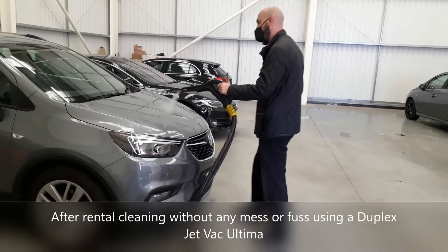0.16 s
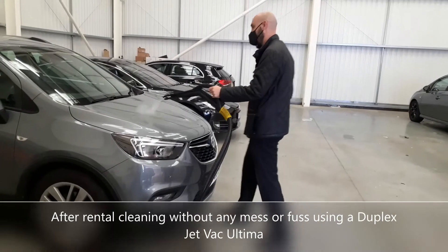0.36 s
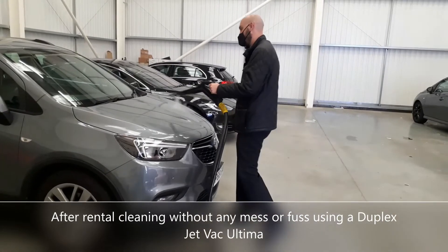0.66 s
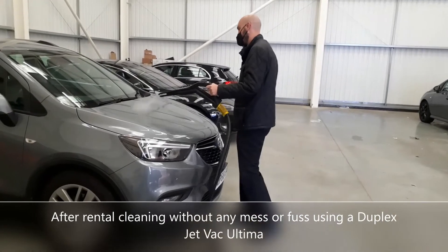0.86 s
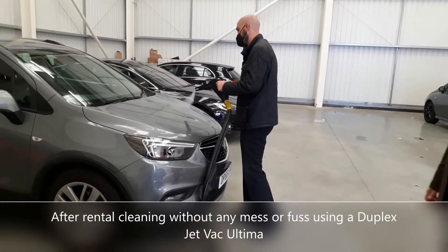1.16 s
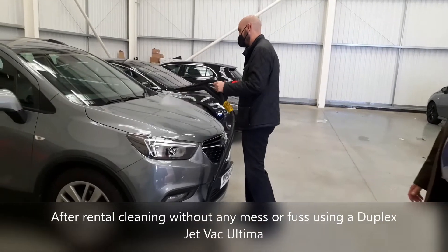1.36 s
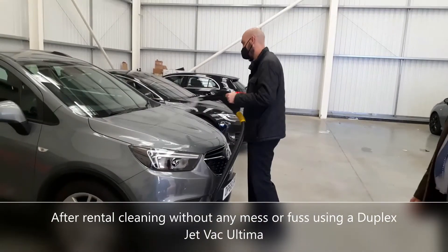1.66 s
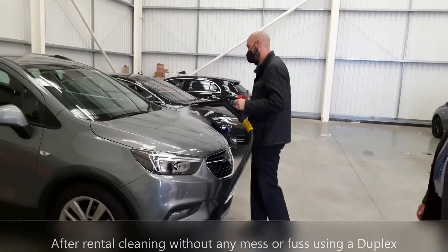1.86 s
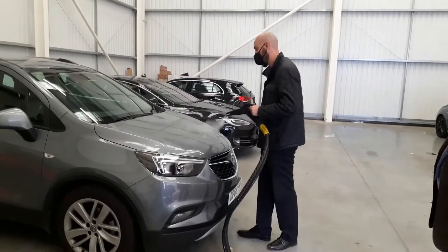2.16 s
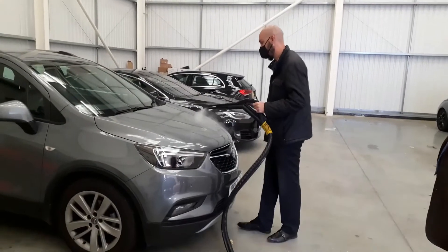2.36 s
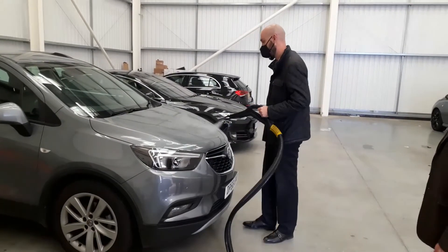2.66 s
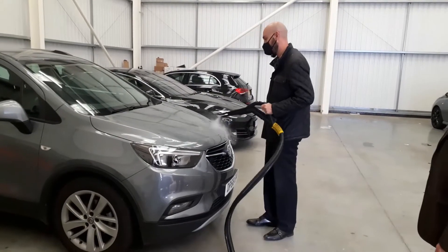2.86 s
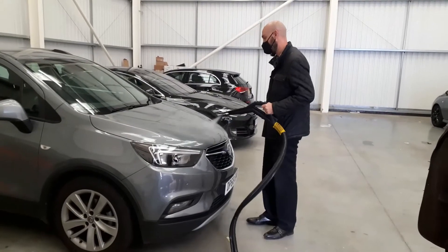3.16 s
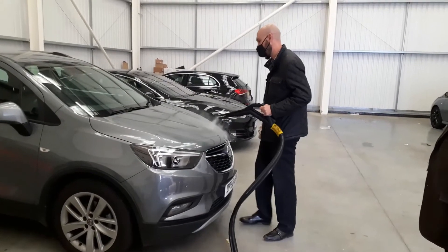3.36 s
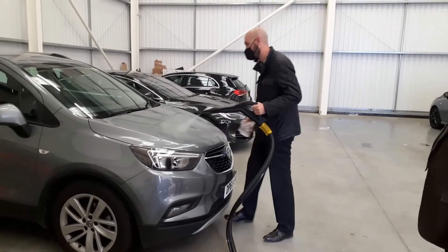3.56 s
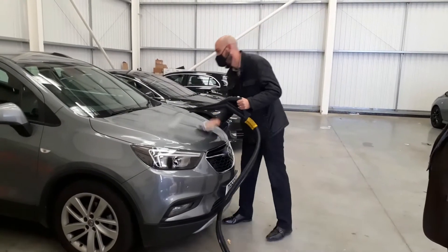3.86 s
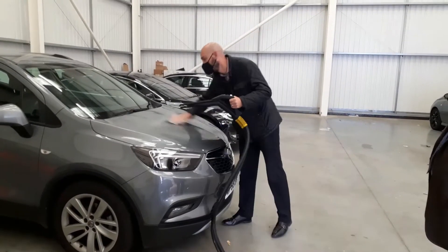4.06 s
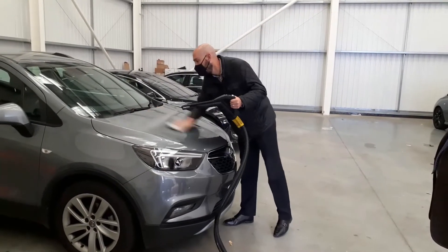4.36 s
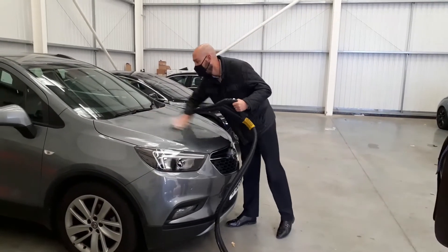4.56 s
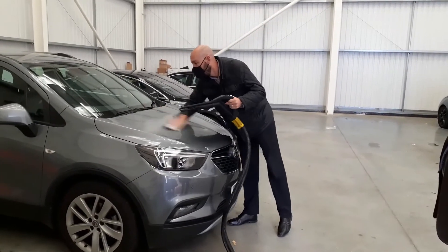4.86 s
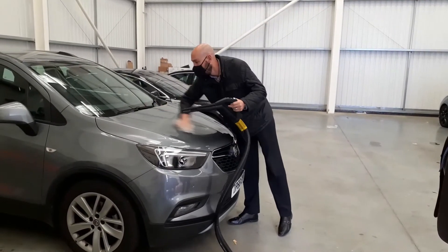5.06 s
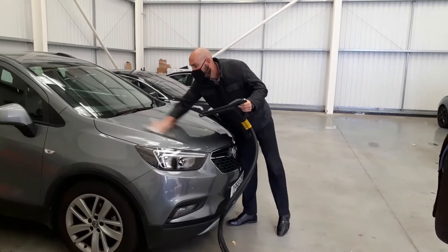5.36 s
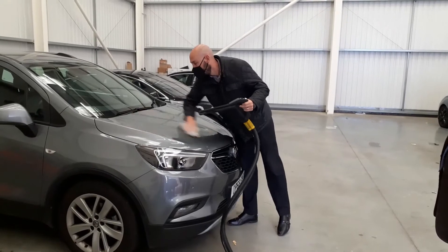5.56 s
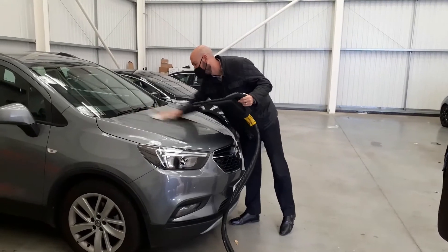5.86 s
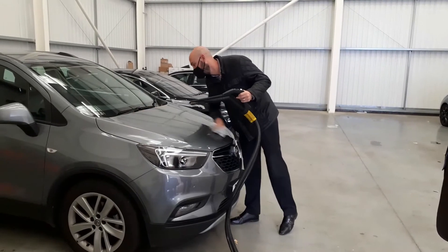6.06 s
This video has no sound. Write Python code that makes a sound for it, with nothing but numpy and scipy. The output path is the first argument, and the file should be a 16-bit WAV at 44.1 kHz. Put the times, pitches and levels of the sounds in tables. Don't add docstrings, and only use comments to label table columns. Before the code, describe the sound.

A large, reverberant metal hall rumbles low throughout. At 0.1-0.25 s a quick cluster of dull door thuds booms, while the steam is still faint. From about 0.3 s a steam lance bursts into a bright, close hiss, fuller by 0.8 s, then steady but fluttering, with short surges as it crosses the car's edges; a hollow, breathy roar colours it around 2 kHz. Faint airy whistles come and go, clearest near 4.85 s. Far away an engine revs up until about 1.5 s, drops by 2 s, then hums on low and fades from earshot around 4.9 s. Panel thuds and a sharper knock land at 1.12-1.2 s; duller thuds and a knock at 3.9-4.3 s, then more from 5.0 to 5.4 s, each with a long hall boom. The hiss is strongest near 4.85-5 s, weakens after 5.2 s and dies away towards 6 s, leaving rumble.

```python
import sys
import numpy as np
from scipy import signal
from scipy.fft import rfft, irfft, next_fast_len
from scipy.io import wavfile

SR = 44100
rng = np.random.default_rng(int(sys.argv[2]) if len(sys.argv) > 2 else 0)


def ratio_of_db(decibels):
    return 10 ** (np.asarray(decibels, float) / 20)


def put_to_file(sound):
    columns = np.atleast_2d(sound).T
    safe = np.clip(columns, -1, 1)
    whole_steps = np.round(safe * 32767)
    wavfile.write(sys.argv[1], SR, whole_steps.astype(np.int16))


N = 273199


def in_time(rows):
    s, *columns = np.transpose(rows)
    return [np.interp(np.arange(N) / SR, s, column) for column in columns]


def at_hz(points, hz):
    table_hz, value = np.array(points)[:, 0], np.array(points)[:, 1]
    return np.interp(np.log(hz), np.log(table_hz), value)


def rms_one(x):
    return x / np.sqrt(np.mean(x ** 2) + 1e-20)


def drift(rate_hz):
    step = 40
    settle = 2000
    r = np.exp(-2 * np.pi * step * rate_hz / SR)
    noise = rng.standard_normal(N // step + settle + 2)
    slow = signal.lfilter([1], [1, -2 * r, r * r], noise)[settle:]
    return np.interp(np.arange(N) / step, np.arange(len(slow)), rms_one(slow))


def bump(s, fall_s, rise_share=1):
    step = 64
    t = np.arange(0, N + step, step) / SR - s
    length_s = max(fall_s, .01) * np.where(t < 0, rise_share, 1)
    bell = np.exp(-(t / length_s) ** 2)
    return np.interp(np.arange(N) / step, np.arange(len(t)), bell)


# frequency in Hz, left-right likeness from 0 to 1.
LIKENESS = [(40, 1), (125, 0.67), (250, 0.76), (500, 0.46), (1000, 0.077), (4000, 0.051)]


def coloured(spectrum, size):
    hz = np.maximum(np.fft.rfftfreq(size, 1 / SR), 1)
    mid, side = rfft(rng.standard_normal((2, size)))
    alike = np.clip(at_hz(LIKENESS, hz), 0, 1)
    both = np.sqrt(1 + alike) * mid + np.sqrt(1 - alike) * side * [[1], [-1]]
    inside = (hz > spectrum[0][0]) & (hz < spectrum[-1][0])
    return rms_one(irfft(both * ratio_of_db(at_hz(spectrum, hz)) * inside, size))


def patchy(noise, low_hz, gain_db, count):
    size = next_fast_len(N, True)
    hz = np.fft.rfftfreq(size, 1 / SR)
    spectrum = rfft(noise, size)
    thirds = np.log2(np.maximum(hz, 1) / low_hz) * 3
    out = 0
    for k in range(count):
        window = np.cos(np.pi / 2 * np.clip(thirds - k, -1, 1)) ** 2
        band = irfft(spectrum * window, size)[:, :N]
        out = out + ratio_of_db(gain_db(low_hz * 2 ** (k / 3))) * band
    return out


# start in seconds, steam flow in dB, nearness to the panel as roar gain
# in dB, aim at the microphone as sizzle gain in dB, pitch of the hollow under the nozzle in Hz.
HANDLING = [(0.0, -61.5, 6, -4, 2000), (0.15, -53.5, -2.5, -5, 2100), (0.275, -51, -4, -4, 2800),
            (0.31, -43.5, -4.5, -6, 3060), (0.72, -47.5, -6.5, -5.5, 2500), (0.78, -42, -8.5, 0, 2150),
            (0.84, -39.5, -3, -3, 1900), (1.31, -40.5, -2, -5.5, 2280), (1.36, -38.5, 2, -5, 2390),
            (1.85, -38, -0.5, -6, 2270), (2.2, -38.5, -1.5, -4.5, 2550), (2.6, -37, -2.5, -4.5, 2360),
            (3.33, -39, -1.5, -3.5, 2540), (3.8, -39, -3.5, -3, 2270), (4.1, -37.5, -2, -2, 2360),
            (5.02, -35.5, -2.5, -2.5, 2380), (5.28, -45.5, 1.5, -2.5, 2207), (6.19, -64, 0, -4, 2003)]
# time in seconds, gain in dB, length in seconds, colour
SURGES = [(0.3, 4.5, 0.036, 0.44), (0.765, 2, 0.019, 1), (0.993, 0, 0.17, 1), (1.17, -1, 0.094, -1.3),
          (1.36, 0.5, 0.025, -1.15), (1.558, 1, 0.16, -0.062), (1.93, 3, 0.12, .4), (2.463, 1.5, .12, 0.79),
          (2.675, 2, 0.057, 0.93), (2.755, 2, 0.1, -0.89), (2.928, 3.5, 0.083, -0.23),
          (3.04, 3.5, 0.17, -0.02), (3.216, 2.5, 0.044, 0.69), (3.434, 4.5, 0.081, -0.24),
          (3.55, 4, 0.096, -0.093), (3.951, 2, 0.14, -1.04), (4.254, 3, 0.17, -0.11),
          (4.4, 0.5, 0.067, 0.91), (4.484, 1.5, .05, 0.99), (4.7, -0.5, 0.035, -0.75),
          (4.758, 1.5, .05, -0.76), (4.849, 5, 0.091, -0.39), (4.912, 1, 0.054, .6), (5.476, 1, 0.17, 0.79),
          (5.65, 3.5, 0.053, 0.062)]
SURGE_RISE_SHARE = 0.47
ROAR_WANDER, SURGE_LIFT = 0.11, 0.061
SIZZLE_SHARE, SWAY_DB = 0.95, 1


def lance():
    flow_db, near_db, aim_db, hollow_hz = in_time(HANDLING)
    surges = np.array([bump(s, fall_s, SURGE_RISE_SHARE) for s, _, fall_s, _ in SURGES])
    _, gain_db, _, colour = np.transpose(SURGES)
    surge_db = gain_db @ surges
    tilt_db = (np.abs(gain_db) * colour) @ surges
    jet_db = flow_db + surge_db
    roar_db = jet_db + near_db - tilt_db
    roar_hz = hollow_hz * (1 + ROAR_WANDER * drift(4.0) + SURGE_LIFT * surge_db)
    sizzle_db = jet_db + aim_db + SIZZLE_SHARE * tilt_db
    return jet_db, roar_db, roar_hz, sizzle_db, SWAY_DB * drift(4.7)


# frequency in Hz, density in dB per Hz.
JET = [(800, -10.5), (1100, -9), (1400, -6.5), (1700, -4), (2080, -4), (2550, -5.5), (3100, -4), (4500, -5),
       (7200, -6.5), (8700, -3.5), (10000, -4), (12000, -1.5), (15000, -3), (16200, -1.5)]


def steam():
    jet_db, roar_db, roar_hz, sizzle_db, sway_db = lance()
    flutter = drift(12.4)

    def band_db(hz):
        low_share = np.clip(np.log2(5500 / hz) / 1.2, 0, 1)
        hollow_db = 1.85 * np.exp(-(np.log2(hz / roar_hz) / 0.2) ** 2)
        hollow_db = hollow_db - 3.7 * np.clip(np.log2(0.71 * roar_hz / hz), 0, 1)
        level_db = low_share * (roar_db + 6.5 + hollow_db) + (1 - low_share) * (jet_db + 4.5)
        if hz > 10000:
            level_db = sizzle_db + 3.5
        return level_db + 0.19 * flutter + 0.73 * drift(8.7)

    jet = patchy(coloured(JET, size=next_fast_len(N, True)), 814, band_db, count=14)
    return jet * ratio_of_db(sway_db * [[.5], [-.5]])


# start in seconds, end in seconds,
# pitch in Hz, width in Hz, level in dB.
WHISTLES = [(0.797, 1.21, 1597, 220, -49.5), (1.366, 1.616, 1940, 299.6, -51),
            (1.618, 2.05, 1890, 300, -50), (2.712, 2.828, 3600, 900, -44), (2.903, 3.104, 3300, 797, -45),
            (3.413, 3.54, 3100, 900, -42), (4.837, 4.952, 2150, 400, -27), (4.944, 5.35, 2150, 500, -48),
            (.293, .345, 3200, 700, -52), (.295, .34, 6000, 3000, -48), (0.807, 0.955, 7940, 900, -39),
            (4.202, 4.548, 12750, 1500, -44)]


def whistles():
    out, t = np.zeros((2, N)), np.arange(N) / SR
    for start, end, hz, width_hz, level_db in WHISTLES:
        r = np.exp(-np.pi * width_hz / SR)
        poles = [1, -2 * r * np.cos(2 * np.pi * hz / SR), r * r]
        tone = signal.lfilter([1], np.convolve(poles, poles), rng.standard_normal((2, N)))
        swell = np.clip(np.minimum((t - start) / 0.031, (end - t) / 0.22), 0, 1)
        out += ratio_of_db(level_db) * swell * rms_one(tone)
    return out


# time in seconds, firing rate in Hz, fundamental in dB, second order in dB.
ENGINE = [(0.0, 45.2, -54, -67), (0.3, 51.84, -50, -44.5), (0.55, 56.5, -51.5, -49.5),
          (0.75, 64.4, -48, -58), (0.83, 65.7, -39.5, -67), (1.12, 71.9, -37.5, -69),
          (1.42, 75.5, -35.5, -72), (1.72, 59.2, -44.5, -61), (1.98, 43.8, -52, -56), (2.2, 42.4, -60, -54),
          (2.28, 44.2, -52, -40.5), (2.65, 47.1, -43, -51), (2.88, 48.8, -37.5, -51),
          (3.17, 50.4, -39, -47.5), (3.3, 51.3, -48.5, -57), (3.97, 50.2, -44, -98),
          (4.18, 49.1, -55.5, -58), (4.92, 47.4, -54, -59.5)]


def engine():
    hz, first_db, second_db = in_time(ENGINE)
    phase = 2 * np.pi * np.cumsum(hz) / SR
    waver = 0.2 * drift(5) + 0.2 * drift(3.7) * [[1], [-1]]
    after_last_s = np.arange(N) / SR - ENGINE[-1][0]
    away_db = -14 * np.clip(after_last_s / 0.0493, 0, 1)
    first = ratio_of_db(first_db + 0.31 * away_db + 2.0 * drift(18.0)) * np.sin(phase + waver)
    second = ratio_of_db(second_db + away_db + 1.4 * drift(3.1)) * np.sin(2 * phase + 1.4 * waver)
    return np.sqrt(2) * (first * ratio_of_db(np.array([[-.2], [.2]])) + second)


# time in seconds, peak in dB, pitch in Hz, T60 in seconds, hall
# answer in dB.
THUDS = [
    (0.103, -30.5, 143, 0.077, -6),
    (0.11, -27, 142, 0.045, -5.5),
    (0.141, -26, 119, 0.045, -1.5),
    (0.185, -29.5, 127, 0.066, 0.5),
    (0.209, -30, 131, 0.11, -15),
    (0.234, -31.5, 240, 0.094, 2),
    (1.134, -34, 136, 0.038, 3),
    (1.164, -27.5, 287, 0.15, -1),
    (1.195, -33.5, 318, 0.068, -13),
         (3.924, -34, 317, 0.065, 3), (3.939, -34, 279, 0.19, -7), (3.957, -35, 306, 0.16, 4.5),
              (4.279, -42, 90.5, 0.12, -4), (4.509, -54, 196.3, 0.1, 11), (5.005, -31, 254, 0.094, 0.5),
              (5.087, -37, 98, 0.19, -4), (5.12, -37, 102.5, 0.2, 3), (5.185, -36, 303, 0.083, 2),
              (5.326, -33.5, 110, 0.11, -6), (5.349, -32.5, 126, 0.1, -11.5), (5.378, -40, 112, 0.23, -4)]
# time in seconds, peak in dB, pitch in Hz, T60 in seconds, hall answer in
# dB.
KNOCKS = [
    (0.805, -45, 590, 0.039, -15),
    (1.122, -39, 586, 0.046, 7.5),
    (1.155, -31.5, 556, 0.081, -18),
    (1.179, -44, 436, 0.016, -3),
    (4.04, -43, 490, 0.13, -7),
]
# frequency in Hz, density in dB per Hz.
BOOM = [(50, -23), (110, -2.5), (200, -1.5), (330, 5), (450, -11.5), (900, -22.5)]
HALL_T60_S, HALL_GAP_S = 1.5, 0.034


def thuds():
    direct, blows = np.zeros(N), np.zeros(N)
    t = np.arange(SR // 4) / SR
    for s, peak_db, hz, t60, hall_db in THUDS + KNOCKS:
        at = round(s * SR)
        shape = (1 - np.exp(-t * hz * 7.0)) ** 2 * ratio_of_db(-60 * t / max(t60, .01))
        direct[at:at + len(t)] += ratio_of_db(peak_db) * shape / shape.max() * np.sin(2 * np.pi * hz * t)
        blows[at] = ratio_of_db(peak_db + hall_db - 42.5)
    t = np.arange(2 * SR) / SR
    onset = np.clip(t / HALL_GAP_S, 0, 1) ** 2
    tail = coloured(BOOM, size=2 * SR) * ratio_of_db(-60 * t / HALL_T60_S) * onset
    return direct + 30 * signal.fftconvolve(blows[None], tail)[:, :N]


# frequency in Hz, density in dB per Hz.
RUMBLE = [(18, -30), (30, -17), (59, 0.5), (118, 2), (198, -2.5), (334, -1.5), (481, -12), (595, -8.5),
          (1120, -16), (1210, -14.5), (1340, -15), (2570, -25), (3000, -27), (3900, -54), (6600, -120)]
# time in seconds, gain in dB, length in seconds, centre in Hz.
BOOMS = [(0.147, 13, 0.082, 140), (0.38, 4.5, 0.1, 277), (0.654, -2.5, .1, 280), (1.178, 15, 0.052, 150),
         (1.214, 6, 0.3, 615), (1.606, 4, 0.82, 280), (2.498, -3.5, 0.12, 300), (3.046, 6.5, 0.32, 282),
         (3.31, 2, 0.058, 150), (3.735, 2.5, 0.26, 290.3), (3.83, -17, .05, 140), (3.937, 11, 0.064, 150),
         (4.507, 4, 0.46, 293), (4.827, -5, 0.05, 168.6), (4.83, 6, 0.054, 790), (5.048, 13, .1, 140),
         (5.202, 0, 0.16, 286), (5.38, 8, 0.088, 140.8), (0.747, -3, 0.14, 260), (1.724, 0, 0.14, 400),
         (1.75, -3, 0.14, 170), (2.0, 5, 0.18, 60), (2.98, -3, .1, 516), (4.95, -12, 0.16, 70),
         (5.793, -6, 0.31, 91), (1.0, -1, 0.13, 150), (3.75, -4.5, .12, 750), (4.55, 2, 0.24, 515),
         (6.036, -2, 0.11, 194)]
RUMBLE_FLOOR_DB, LOWER_DB, UPPER_DB = -52.5, -2.5, -4
ENGINE_SHARE, STEAM_SHARE = 0.087, 0.29
BOOM_OCTAVES, BOOM_RISE_SHARE = 0.58, 0.48
HEAVE_DB = 1.14


def rumble():
    engine_db, steam_db = in_time(ENGINE)[1], in_time(HANDLING)[0]
    level_db = RUMBLE_FLOOR_DB + ENGINE_SHARE * (engine_db + 47.5) + HEAVE_DB * drift(4.7)
    upper_db = UPPER_DB + STEAM_SHARE * (steam_db + 43)
    swells = np.array([bump(s, length_s, BOOM_RISE_SHARE) for s, _, length_s, _ in BOOMS])
    _, gain_db, _, centre_hz = np.transpose(BOOMS)

    def band_db(hz):
        upper_share = np.clip(np.log2(hz / 330) / .5, 0, 1)
        lower_share = np.clip(np.log2(240 / hz) / 0.3, 0, 1) * np.clip(np.log2(hz / 70) / .5, 0, 1)
        parts_db = upper_share * (upper_db + 6.0) + lower_share * (LOWER_DB + 1.0)
        nearness = np.exp(-(np.log2(hz / centre_hz) / BOOM_OCTAVES) ** 2)
        booms_db = (gain_db * nearness) @ swells
        return level_db + 5.0 + parts_db + booms_db + 2.25 * drift(16.0)

    return patchy(coloured(RUMBLE, size=next_fast_len(N, True)), 31.1, band_db, count=21)


def scene():
    return steam() + whistles() + engine() + thuds() + rumble()


# frequency in Hz, left over right in dB.
PORTS = [(60, -1.7), (150, 0.6), (300, -1.7), (1200, -0.4), (2800, 1), (5600, -2.1), (9500, .5),
         (14000, 0.1)]


def ports(dry):
    size = next_fast_len(N, True)
    tilt_db = at_hz(PORTS, np.maximum(np.fft.rfftfreq(size, 1 / SR), 1))
    return irfft(rfft(dry, size) * ratio_of_db(tilt_db * [[.5], [-.5]]), size)[:, :N]


def low_pass(x):
    return signal.sosfilt(signal.butter(12, 16870, fs=SR, output="sos"), x)


def record(dry):
    left, right = ports(dry)
    late = np.array([left, np.roll(right, 3)])
    top_cut = signal.ellip(12, .5, 80, 15730, fs=SR, output="sos")
    mix = signal.sosfilt(top_cut, late)
    return low_pass(mix)


dry = scene()
out = record(dry)
put_to_file(out)
```